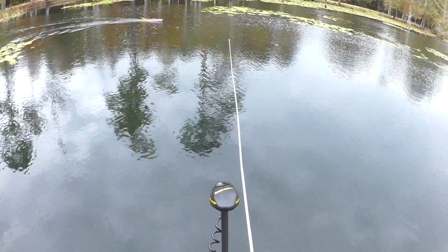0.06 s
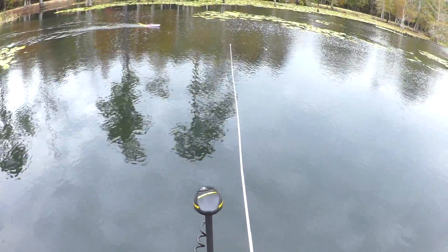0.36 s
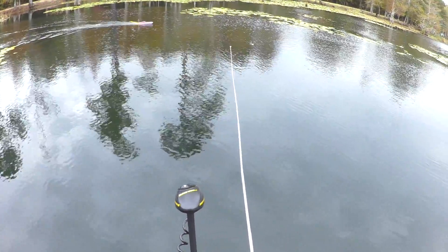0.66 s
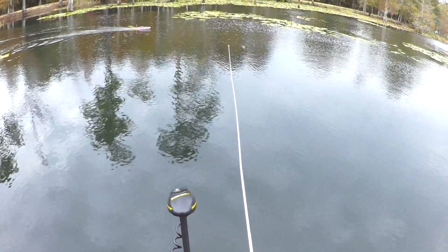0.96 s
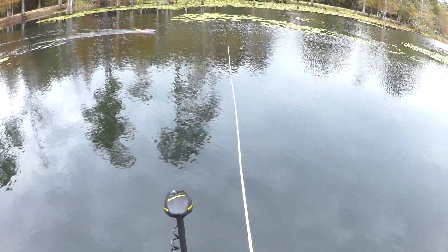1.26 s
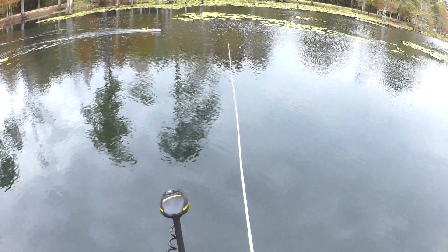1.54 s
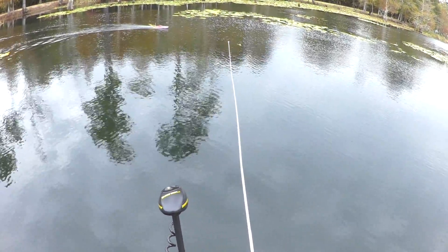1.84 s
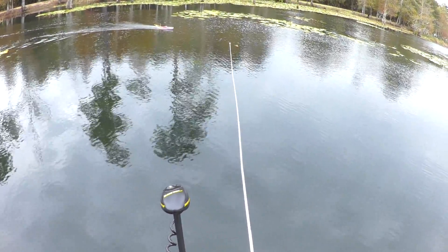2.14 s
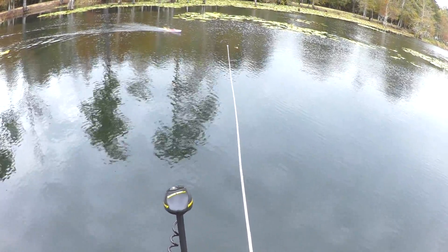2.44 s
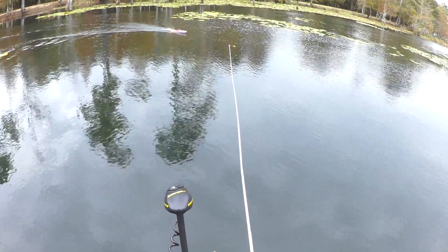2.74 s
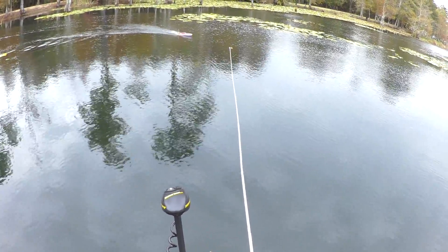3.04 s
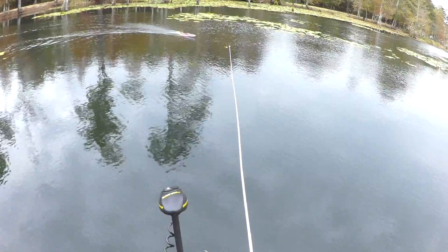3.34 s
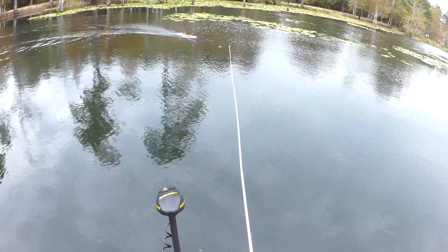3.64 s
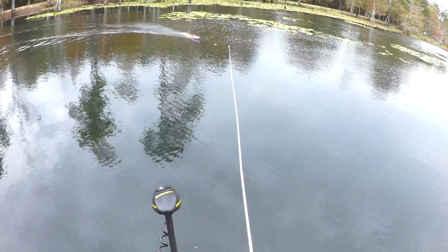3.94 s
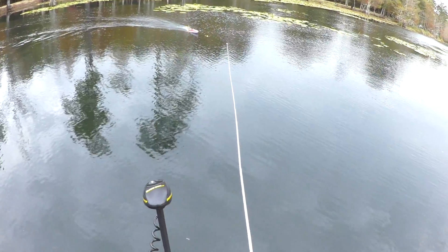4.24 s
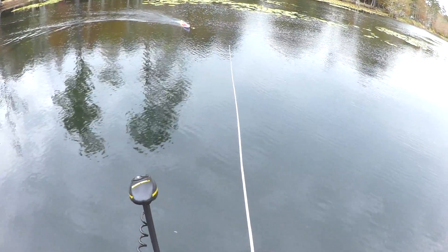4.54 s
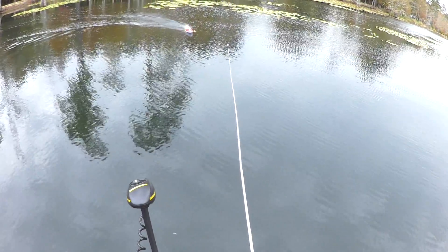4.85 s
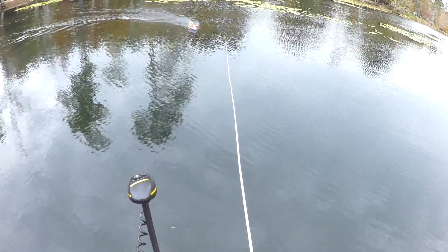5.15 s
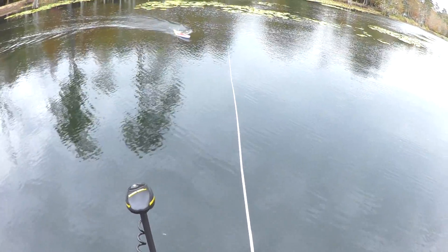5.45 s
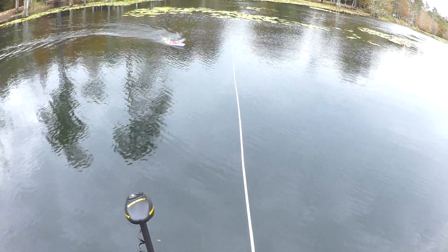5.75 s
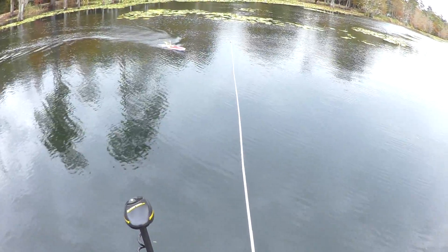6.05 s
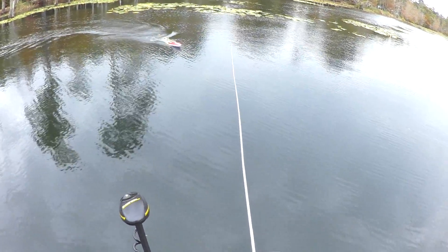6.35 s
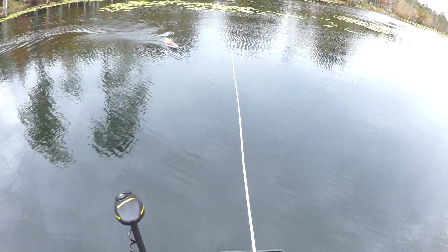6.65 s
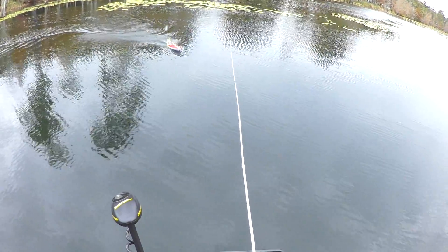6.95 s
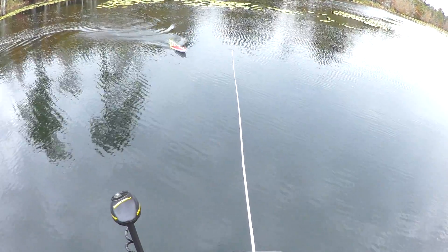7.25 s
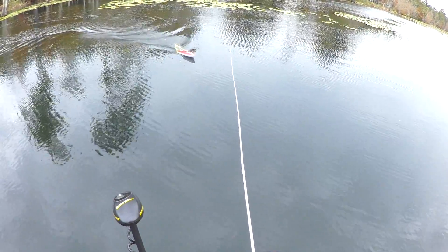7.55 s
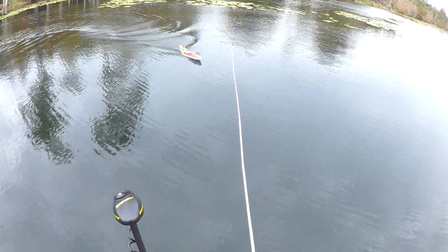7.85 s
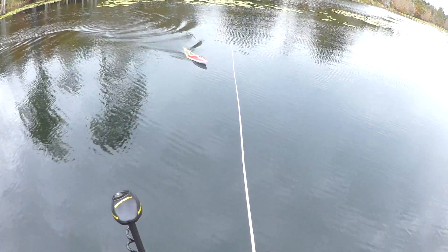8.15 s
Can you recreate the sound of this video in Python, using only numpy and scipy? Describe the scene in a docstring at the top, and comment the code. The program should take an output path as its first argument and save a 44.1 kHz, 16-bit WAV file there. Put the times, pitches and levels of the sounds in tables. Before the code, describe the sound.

Muffled splashing and motor hum of an approaching radio-controlled boat, with sharp ticks and a spell of hollow knocks on the camera mount.

```python
"""A radio-controlled model boat's propeller churns, spits and throws spray at the surface of a pond.
Its electric motor hums through the hull. The boat crosses, then turns towards a camera in a
waterproof case; churn and hum falter when the propeller loses grip. The case muffles the treble
and picks up a few sharp ticks and a spell of rubbing and knocking on its mount."""
import sys
import numpy as np
from scipy.fft import rfft, irfft, next_fast_len
from scipy.io import wavfile
from scipy.ndimage import map_coordinates

SR = 44100
rng = np.random.default_rng(int(sys.argv[2]) if len(sys.argv) > 2 else 0)


def log_audio(samples):
    """Write samples as a 16-bit WAV file to the path given in sys.argv[1]."""
    # one column per channel
    frames = np.atleast_2d(samples).T
    # limit to full scale, then quantise
    limited = np.clip(frames, -1, 1)
    pcm = np.round(limited * 32767).astype(np.int16)
    wavfile.write(sys.argv[1], SR, pcm)


N = 370440

# faint low hum: time_s, pitch_hz, level_db
HUM_TRACK = [(0, 121, -77), (1.2, 122, -80), (1.8, 135.4, -86), (5.4, 145.5, -92), (5.8, 110, -78.5),
             (8.4, 111.4, -82.5)]
# air and microphone hiss: freq_hz, density_db
HISS_SPECTRUM = [(20, 13.5), (90, 13.5), (300, 6), (2500, 0), (4400, -50), (5000, -6), (5700, 0.5),
                 (6800, 2), (8000, 4), (10000, 6.5), (13000, 4), (15000, 13), (16000, 12.5)]
# bright swishes: centre_s, half_width_s, level_db
SWISH_EVENTS = [(4.901, 0.0092, -38.5), (5.462, 0.037, -47)]
# ticks on the case: start_s, level_db, pitch_hz, treble_db
CASE_TICKS = [(0.6365, -30.5, 2130, -26), (0.9941, -28.5, 2340, -19), (1.2418, -31.5, 1670, -15.5),
              (2.029, -33, 2350, -18), (2.034, -22, 2440, -23), (2.3858, -22, 2330, -21.5),
              (4.7228, -32.5, 2300, -19), (4.999, -21.5, 2090, -36), (5.111, -21.5, 1934, -34),
              (6.9529, -34, 2300, -11), (7.043, -26.5, 2280, -20)]
# knocks on the mount: start_s, level_db, pitch_hz
MOUNT_KNOCKS = [(0.636, -22.5, 576), (6.077, -24, 710), (6.098, -22, 397), (6.134, -18, 425),
                (6.157, -28, 497), (6.196, -24, 382), (6.375, -5, 740), (6.684, -19, 414),
                (6.694, -19.5, 1420), (6.7604, -11.5, 430), (6.769, -20, 910), (6.774, -16, 380),
                (6.7775, -19, 1240), (6.783, -22, 450), (6.7984, -21, 400), (6.806, -23, 380),
                (6.858, -9.5, 377), (6.886, -18, 380), (6.888, -20, 1200), (6.894, -9, 626),
                (6.924, -24, 414), (6.964, -21, 350), (6.982, -14, 404), (6.994, -24, 1000)]
# rubbing strokes on the mount: start_s, length_s, level_db
MOUNT_RUBS = [(5.96, 0.2, -31.5), (6.312, 0.036, -28), (6.665, 0.03, -31), (6.752, 0.027, -29),
              (6.855, 0.044, -37), (6.933, 0.057, -34)]
# swish, shell rattle, mount friction: freq_hz, density_db
SWISH_SPECTRUM = [(800, -24), (2900, 2), (3500, -12), (4400, -41), (5700, -34), (6700, -20), (10000, -28),
                  (16000, -30)]
SHELL_SPECTRUM = [(200, -61), (900, 1), (1500, -3), (1950, 4.5), (2900, 1.5), (3500, -13), (4300, -41),
                  (8000, -64)]
FRICTION_SPECTRUM = [(40, -26), (90, -16), (160, -4.5), (330, 1), (500, 0), (800, -5), (1400, -12),
                     (2000, -13), (3000, -29), (6000, -72)]

# boat's course: time_s, distance_m, turn (0 side-on, 1 towards the camera), motor_hum_db
BOAT_COURSE = [(0, 20.8, 0, -64), (1.6, 18.1, 0, -50.5), (2.4, 18, 0, -50), (4.3, 16.1, 0.02, -49),
               (5.0, 18, 0.23, -47.5), (5.35, 11.5, 0.27, -49), (6.1, 9.7, 0.69, -47.5),
               (6.65, 9.8, 0.74, -48), (7.2, 9.8, 1, -50.5), (8.4, 7.74, 0.97, -50.5)]
# shaft speed: time_s, speed_hz
SHAFT_SPEED = [(0, 49.2), (1.1, 49), (1.6, 47.1), (2.05, 47.6), (2.3, 50.6), (2.6, 53.4), (3.1, 53.2),
               (3.5, 53.6), (3.85, 53.2), (4.1, 52.1), (4.58, 52), (4.8, 50.9), (5.1, 50.4), (5.4, 53.2),
               (5.75, 48.8), (7.05, 50.6), (7.6, 49.7), (8.05, 48.5), (8.4, 49.3)]
# propeller loses grip: centre_s, half_width_s, loss_db
GRIP_LOSSES = [(1.03, 0.022, 4), (4.7, 0.1, 1.5), (5.07, 0.086, 9), (5.155, 0.028, 1), (5.62, 0.059, 5),
               (8.13, 0.045, 3.5)]
# hull's radiation of the motor orders: freq_hz, gain_db
HULL_RESPONSE = [(100, -25), (160, -27), (190, -14.5), (210, -6), (236, -15), (262, -6), (290, -16.5),
                 (320, -9.5), (355, -14), (385, -4), (402, -1.5), (432, -7), (458, 3.5), (472, 3),
                 (482, -4), (530, -15.5), (585, -8.5), (613, 0.5), (645, -12), (685, -1), (705, -6),
                 (728, 8), (755, -4.5), (795, 6), (835, -9), (890, 3.5), (940, -2.5), (1040, 4),
                 (1150, -3.5), (1350, -8.5)]
# bow-on hull drone: shaft_order, level_db
DRONE_ORDERS = [(8, -28), (14, -33)]
# hull resonances side-on, angled, bow-on: centre_hz, width_hz, lift_db
SIDE_MODES = [(718, 38, 6.5), (797, 18, 4), (1038, 100, 5), (1170, 40, -6), (423, 50, -2.5)]
ANGLED_MODES = [(320, 55, -7.5), (374, 36, 11), (480, 31, 7), (686, 26, 8.5), (760, 20, 4), (830, 27, 4),
                (990, 69, 5)]
BOW_MODES = [(245, 35, 5), (481, 37, 1), (580, 90, -4), (690.5, 29, 4.5), (859, 67, 7), (1027, 94, 6),
             (1233, 32, -3.5), (1275, 58, 5.5)]
# big drops: start_s, level_db
BIG_DROPS = [(0.2483, -48), (0.4858, -45.5), (0.7811, -47), (0.8348, -47), (0.9852, -45), (1.2242, -50),
             (1.611, -42), (1.8755, -43), (1.9278, -45), (2.2887, -49), (2.494, -40), (2.576, -43.5),
             (2.7152, -47), (3.3453, -46.5), (4.49, -40), (4.567, -44), (4.5855, -44), (4.682, -45),
             (4.6912, -45), (6.398, -49), (7.46, -38), (7.789, -41), (8.09, -41), (8.247, -40)]
# loud spits: start_s, level_db, pitch_hz
LOUD_SPITS = [(0.0681, -30, 1900), (0.292, -29, 2010), (0.3935, -30.5, 2140), (0.401, -39, 1930),
              (0.414, -38, 2200), (0.435, -30, 1620), (0.4658, -35, 1620), (0.4943, -34.5, 2340),
              (0.5147, -38, 2310), (0.5358, -30, 1900), (0.578, -27.5, 1590), (0.6569, -32, 2200),
              (0.6789, -36, 2160), (0.7607, -29.5, 1600), (0.82, -33.5, 2170), (0.8649, -31.5, 1610),
              (0.902, -37, 1190), (1.0675, -35, 2280), (1.1094, -39, 1570), (4.5217, -28.5, 1930),
              (5.176, -33, 955), (5.6392, -30.5, 2040), (6.473, -26.5, 2450)]
# spells of small drops and weak spits: start_s, end_s, rate_per_s
SMALL_DROP_SPELLS = [(.2, 2.4, 4), (2.4, 2.8, 22), (3.2, 3.9, 14), (4.4, 4.95, 42)]
WEAK_SPIT_SPELLS = [(.1, 1.5, 9)]
# showers of spray: centre_s, half_width_s, lift_db
SPRAY_SHOWERS = [(2.56, 0.25, 3), (3.5, 0.34, 3), (4.62, 0.093, 2), (5.5, 0.3, 0)]
# spray and churn through the case, far and near: freq_hz, density_db
FAR_SPRAY_SPECTRUM = [(3500, -53), (4550, -16), (4900, -4.5), (5300, -11), (5700, -22), (6400, -2),
                      (6950, 2.5), (7350, -4.5), (7800, -14), (9150, -6), (10200, -12), (16000, -14.5)]
NEAR_SPRAY_SPECTRUM = [(3500, -33), (4200, -16.5), (4550, -15.5), (5000, -2.5), (5700, -14.5),
                       (6250, -10.5), (6600, -2.5), (6950, 3.5), (7600, -1), (8000, -18), (8400, -16.5),
                       (9150, -3), (10000, -13), (12000, -14.5), (13200, -16), (16000, -9)]
FAR_CHURN_SPECTRUM = [(71, -47), (120, -36), (177, -27), (206, -26), (347, -16.5), (380, -11), (462, -9.5),
                      (505, -7), (713, -3.5), (948, -3.5), (1040, -4.5), (1400, -6.5), (2510, -5),
                      (3000, -13), (4300, -40.5), (5590, -80), (9460, -120)]
NEAR_CHURN_SPECTRUM = [(71, -50), (120, -27), (194, -26.5), (254, -16.5), (347, -17), (392, -10),
                       (536, -6.5), (682, -1), (948, -7), (1040, -4), (1460, -8), (2330, -1.5),
                       (3090, -11.5), (3810, -33), (4300, -54), (5590, -46), (9460, -120)]

SIDE_ON_TURN, ANGLED_TURN, BOW_ON_TURN = 0.17, 0.25, 0.74  # crossfade points of the hull modes


def amp(db):
    return 10 ** (np.asarray(db) / 20)


def unit(x):
    return x / np.sqrt(np.mean(x ** 2) + 1e-20)


def along(points, hz):
    """Interpolate (freq_hz, value) points on a log axis."""
    f, v = np.transpose(points)
    return np.interp(np.log(hz + 1), np.log(f + 1), v)


def curves(rows):
    """Per-sample curve for each column after time_s."""
    time_s, *cols = np.transpose(rows)
    return [np.interp(np.arange(N) / SR, time_s, c) for c in cols]


def wobble(rate_hz):
    """Smooth random curve, rate_hz knots a second."""
    knots = rng.standard_normal(int(N * rate_hz / SR) + 4)
    return map_coordinates(knots, [np.arange(N) * rate_hz / SR])


def swells(rows):
    """Sum of bell curves, in dB."""
    t = np.arange(N) / SR
    return sum(db * np.exp(-((t - centre_s) / half_s) ** 2) for centre_s, half_s, db in rows)


def scattered(spells):
    """Random times at each spell's rate."""
    return np.concatenate([rng.uniform(start, end, round(rate * (end - start)))
                           for start, end, rate in spells])


def coloured(x, gain_db):
    """Minimum-phase filter with response gain_db(hz)."""
    m = 2 * next_fast_len(N // 2 + SR // 8)
    cepstrum = irfft(np.log(amp(gain_db(np.fft.rfftfreq(m, 1 / SR)))), m)
    cepstrum[1:m // 2] *= 2
    cepstrum[m // 2 + 1:] = 0
    return irfft(rfft(x, m) * np.exp(rfft(cepstrum)), m)[:N]


def shaped(x, spectrum, modes=()):
    """Filter by a spectrum plus resonances; rms 1."""
    lift = lambda hz: sum(db / (1 + (2 * (hz - centre) / width) ** 2) for centre, width, db in modes)
    return unit(coloured(x, lambda hz: along(spectrum, hz) + lift(hz)))


def grains(rate_hz, spread_db, share):
    """Tiny random impacts holding a share of the power; the rest is white noise."""
    hits = (rng.random(N) < rate_hz / SR) * np.sign(rng.standard_normal(N))
    sizes = amp(spread_db * np.clip(rng.standard_normal(N), -2, 2))
    return np.sqrt(share) * unit(hits * sizes) + np.sqrt(1 - share) * rng.standard_normal(N)


def add(track, start_s, sound):
    part = track[round(start_s * SR):][:len(sound)]
    part += sound[:len(part)]


def background():
    """Soft outdoor air, microphone hiss and a faint low hum."""
    pitch_hz, level_db = curves(HUM_TRACK)
    hum = amp(level_db + 0.65 * wobble(3.6)) * unit(np.sin(2 * np.pi * np.cumsum(pitch_hz) / SR))
    return hum + amp(-62.5) * shaped(rng.standard_normal(N), HISS_SPECTRUM)


def swishes():
    """Short bright scrapes of noise swell and fade."""
    t = np.arange(N) / SR
    envelope = sum(amp(db) * np.exp(-((t - centre_s) / half_s) ** 2)
                   for centre_s, half_s, db in SWISH_EVENTS)
    return envelope * shaped(rng.standard_normal(N), SWISH_SPECTRUM)


def case_ticks(t60_s=0.021, tail_t60_s=0.14, tail_db=-16, attack_s=0.00078):
    """Each tick rattles the plastic shell and rings one of its modes."""
    out, t = np.zeros(N), np.arange(SR // 10) / SR
    shell = shaped(rng.standard_normal(N), SHELL_SPECTRUM)
    treble_hz_db = [(3000, -11), (5200, -2), (6800, 14), (8200, 7), (10000, 10.5), (12500, 2), (16000, 6)]
    treble = shaped(rng.standard_normal(N), treble_hz_db)
    decay = amp(-60 * t / t60_s) + amp(tail_db - 60 * t / tail_t60_s)
    for start_s, db, hz, treble_db in CASE_TICKS:
        span = round(start_s * SR) + np.arange(len(t))
        body = (shell[span] + 0.87 * np.sin(2 * np.pi * hz * t)) * (1 - np.exp(-t / attack_s))
        edge = amp(db + treble_db - 1.5) * treble[span]
        add(out, start_s, decay * (amp(db - 3.5) * body + edge))
    return out


def mount(knock_t60_s=0.022, attack_s=0.00082, clack_hz=1350, clack_t60_s=0.0035,
          rattle_db=-13, rattle_t60_s=0.016, rub_rise_db=10.5, rub_t60_s=0.22):
    """The mount creeps in dull grainy strokes and slips with hollow, clacking knocks."""
    knocks, friction, t = np.zeros(N), np.zeros(N), np.arange(SR // 10) / SR
    for start_s, db, hz in MOUNT_KNOCKS:
        hollow = np.sin(2 * np.pi * hz * t) * amp(-60 * t / knock_t60_s)
        clack = 0.95 * np.sin(2 * np.pi * clack_hz * t) * amp(-60 * t / clack_t60_s)
        knock = (hollow + clack) * (1 - np.exp(-t / attack_s))
        add(knocks, start_s, amp(db - 6) * knock / np.abs(knock).max())
        add(friction, start_s, amp(db + rattle_db - 60 * t / rattle_t60_s))
    t = np.arange(SR // 2) / SR
    for start_s, length_s, db in MOUNT_RUBS:
        stroke_db = np.minimum(rub_rise_db * (t / length_s - 1), -60 * (t - length_s) / rub_t60_s)
        add(friction, start_s, amp(db + stroke_db))
    grit = shaped(grains(rate_hz=440, spread_db=2.5, share=0.67), FRICTION_SPECTRUM)
    # the small case cuts deep bass and treble
    case_hz_db = [(50, -48), (110, -12.5), (280, -4.5), (1600, -3), (2800, -15), (4500, -17)]
    return coloured(knocks + friction * grit, lambda hz: along(case_hz_db, hz))


def spatter(t60_s=0.011, small_db=-53.5, gain_db=-2):
    """Single drops hit the water with a crisp tick."""
    envelope, t = np.zeros(N), np.arange(SR // 30) / SR
    small = [(start_s, small_db + 2 * rng.normal()) for start_s in scattered(SMALL_DROP_SPELLS)]
    for start_s, db in BIG_DROPS + small:
        add(envelope, start_s, amp(db + gain_db - 60 * t / t60_s))
    drop_hz_db = [(3000, -49), (5700, -25), (6700, 12.5), (8200, -10), (10000, -7.5), (16000, -36)]
    return envelope * shaped(rng.standard_normal(N), drop_hz_db)


def spits(t60_s=0.012, attack_s=0.0006, weak_db=-38, weak_hz=1980, gain_db=9.5):
    """Air pockets torn by a blade: rough, pitched pops with a snap of noise."""
    out, t = np.zeros(N), np.arange(SR // 30) / SR
    weak = [(start_s, weak_db + 2 * rng.normal(), weak_hz * np.exp(0.21 * rng.normal()))
            for start_s in scattered(WEAK_SPIT_SPELLS)]
    for start_s, db, hz in LOUD_SPITS + weak:
        waver_rad = 0.14 * np.cumsum(rng.standard_normal(len(t)))
        rough = np.sin(2 * np.pi * hz * t + waver_rad) + 0.11 * rng.standard_normal(len(t))
        pop = rough * amp(-60 * t / t60_s) * (1 - np.exp(-t / attack_s)) ** 2
        add(out, start_s, amp(db + gain_db) * pop / np.abs(pop).max())
    filter_hz_db = [(200, -40), (800, -9), (2700, -5), (4200, -24),
                    (5000, -13.5), (7000, -17), (12000, -14)]
    return coloured(out, lambda hz: along(filter_hz_db, hz))


def motor(shaft_rad, off_axis_loss_db=30):
    """Shaft orders hum through the hull, which drones bow-on; both dip when grip is lost."""
    distance_m, turn, hum_db = curves(BOAT_COURSE)
    orders, drone = np.zeros(N), np.zeros(N)
    for order in range(2, 26):
        strength = amp((0.6 + 0.08 * order) * wobble(6))  # high orders waver more with the load
        phase_rad = order * shaft_rad + 0.02 * order * wobble(14) + rng.uniform(0, 2 * np.pi)
        orders += strength * np.sin(phase_rad)
    for order, db in DRONE_ORDERS:
        strength = amp(3 * wobble(20))
        drone += amp(db) * unit(strength * np.sin(order * shaft_rad + 0.75 * wobble(35)))
    hum = amp(hum_db) * shaped(orders, HULL_RESPONSE)
    drone *= amp(off_axis_loss_db * (turn - 1)) / distance_m
    return amp(-swells(GRIP_LOSSES)) * (hum + drone)


def churn(shaft_rad, turn, bite):
    """Splashes pulse at shaft and blade rate; hull resonances crossfade with the turn."""
    side_on = np.interp(turn, [SIDE_ON_TURN, ANGLED_TURN], [1, 0])
    bow_on = np.interp(turn, [ANGLED_TURN, BOW_ON_TURN], [0, 1])
    angled = 1 - side_on - bow_on
    pulse = bite * amp(1.5 * np.cos(shaft_rad) + 0.8 * np.cos(2 * shaft_rad))
    far = pulse * grains(rate_hz=2600, spread_db=3, share=0.47)
    near = pulse * grains(rate_hz=1700, spread_db=1, share=0.72)
    return (side_on * shaped(far, FAR_CHURN_SPECTRUM, SIDE_MODES)
            + angled * shaped(far, FAR_CHURN_SPECTRUM, ANGLED_MODES)
            + np.sqrt(bow_on * (2 - bow_on)) * shaped(near, NEAR_CHURN_SPECTRUM, BOW_MODES))


def spray(shaft_rad, turn, facing, bite):
    """Droplets thrown by the blades; the hiss spreads upward as the bow comes round."""
    fine = grains(rate_hz=1100, spread_db=2.5, share=0.8) * amp(0.61 * wobble(28))
    sparse = np.sqrt(1 - facing) * grains(rate_hz=42, spread_db=-2, share=1)  # big drops, from afar
    drops = (fine + 0.42 * sparse) * bite * amp(np.cos(shaft_rad) + 1.2 * np.cos(2 * shaft_rad))
    return (1 - turn) * shaped(drops, FAR_SPRAY_SPECTRUM) + turn * shaped(drops, NEAR_SPRAY_SPECTRUM)


def propeller(shaft_rad, churn_db=-16, spray_db=-43, spray_turn_db=7, chop_hz=9):
    """Two blades throw churn and spray, louder as the boat nears; more spray comes bow-on."""
    distance_m, turn, _ = curves(BOAT_COURSE)
    facing = np.clip(turn / BOW_ON_TURN, 0, 1)
    chop = wobble(chop_hz)  # ripples rock the boat
    bite = amp(0.59 * wobble(35) + (1.02 + 0.72 * facing) * wobble(220))  # uneven blade grip
    churn_gain = amp(churn_db + 0.22 * chop)
    spray_gain = amp(spray_db + spray_turn_db * facing ** 3 + 0.5 * chop + swells(SPRAY_SHOWERS))
    wash = churn_gain * churn(shaft_rad, turn, bite) + spray_gain * spray(shaft_rad, turn, facing, bite)
    return amp(-swells(GRIP_LOSSES)) * wash / distance_m


def scene():
    """Boat, case and mount noises, quiet pond; mono."""
    shaft_rad = 2 * np.pi * np.cumsum(curves(SHAFT_SPEED)[0]) / SR
    boat = motor(shaft_rad) + propeller(shaft_rad) + spits() + spatter()
    return (boat + swishes() + case_ticks() + mount() + background())[None]


def record(dry):
    """Cased camera: a narrow notch and a hard band limit."""
    notch_db, notch_hz, half_width_hz, limit_hz = -26, 5720, 85, 15850
    notched = coloured(dry[0], lambda hz: notch_db / (1 + ((hz - notch_hz) / half_width_hz) ** 2))
    return irfft(rfft(notched) * (np.fft.rfftfreq(N, 1 / SR) < limit_hz), N)[None]


dry = scene()
out = record(dry)
log_audio(out)
```